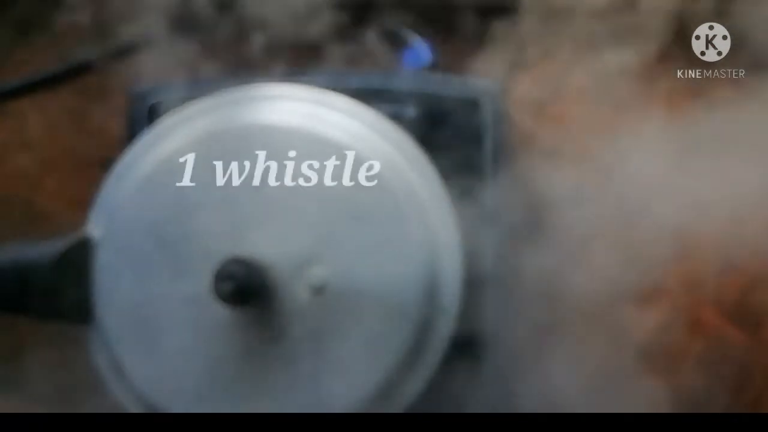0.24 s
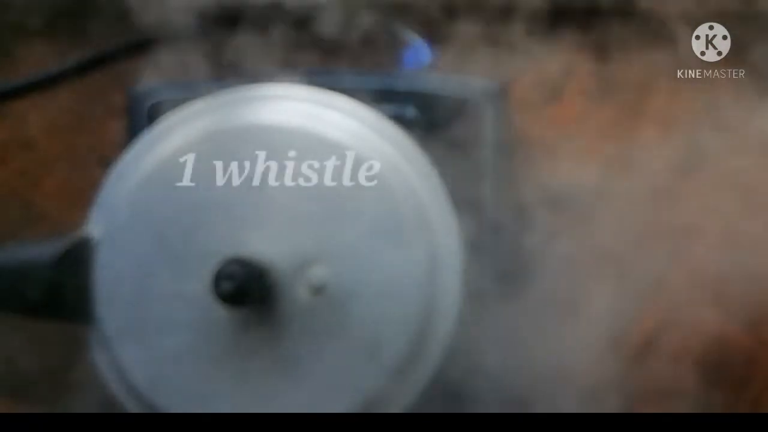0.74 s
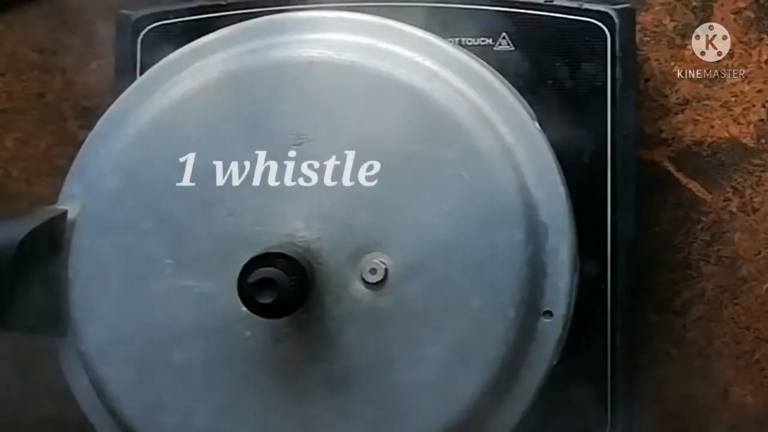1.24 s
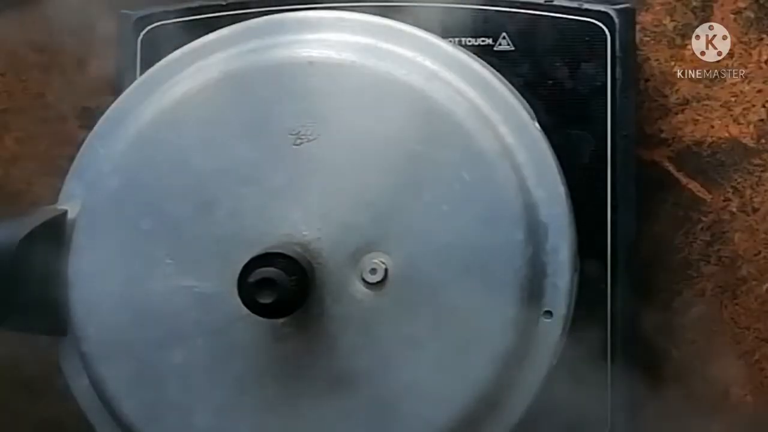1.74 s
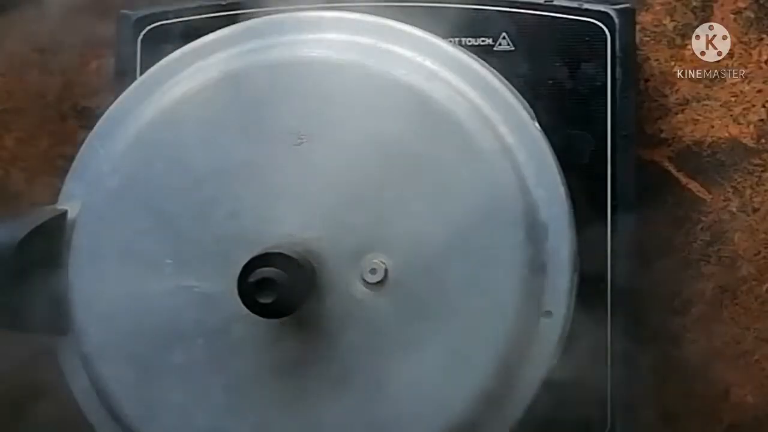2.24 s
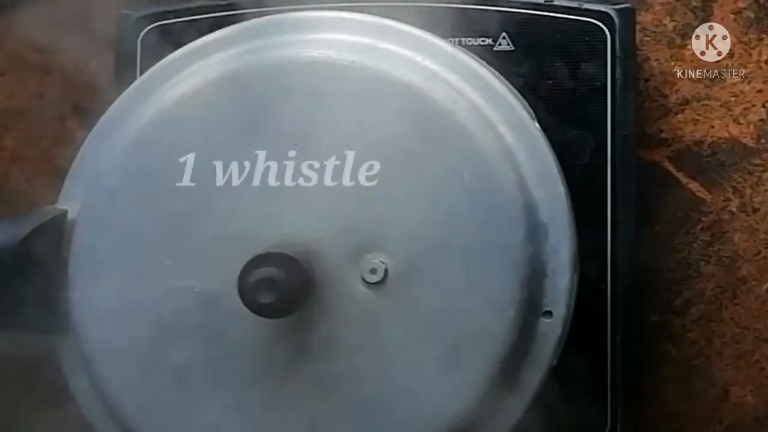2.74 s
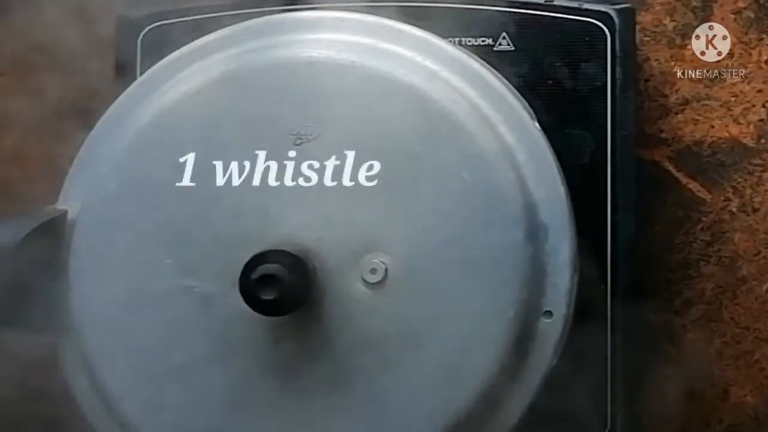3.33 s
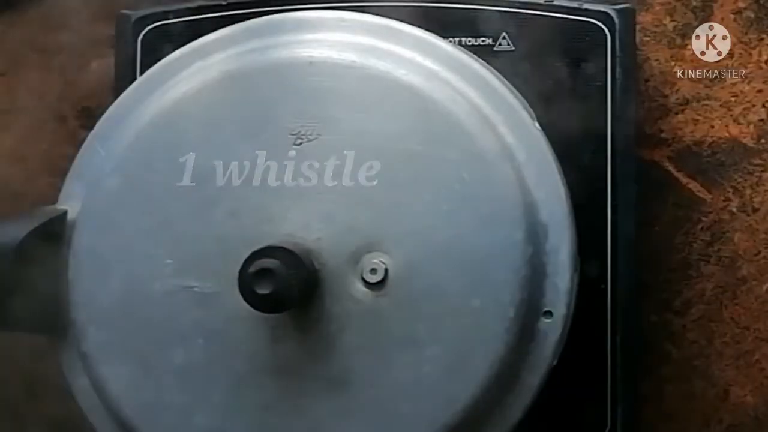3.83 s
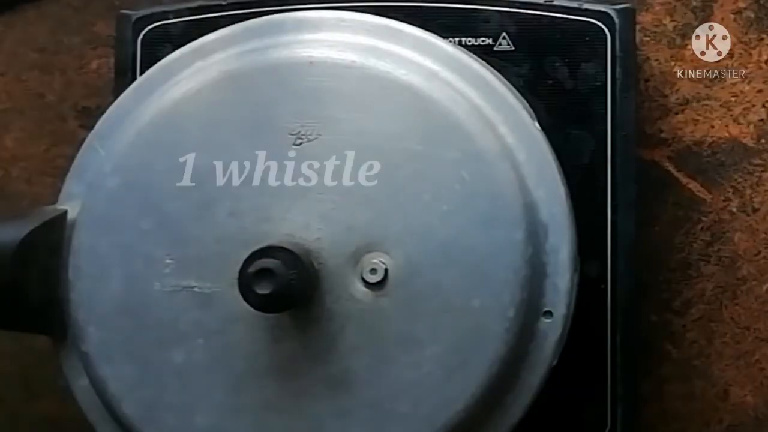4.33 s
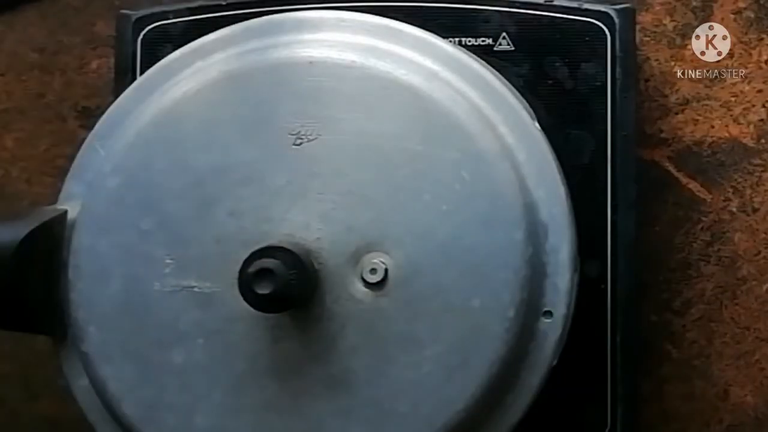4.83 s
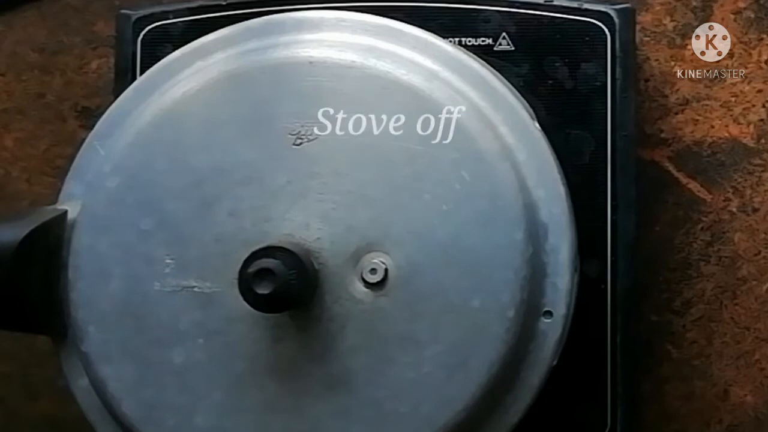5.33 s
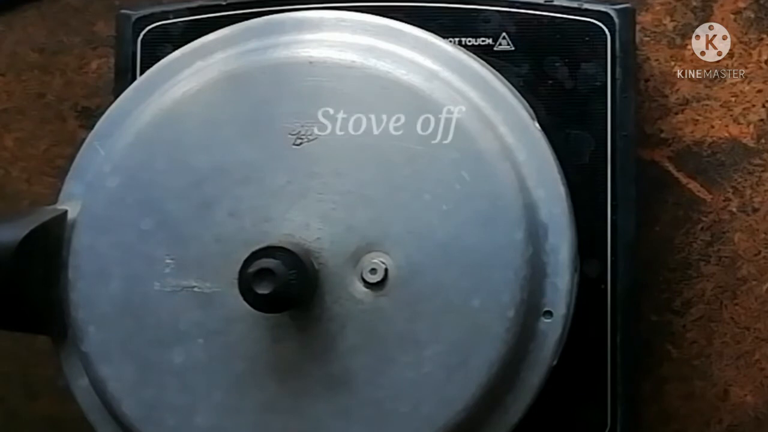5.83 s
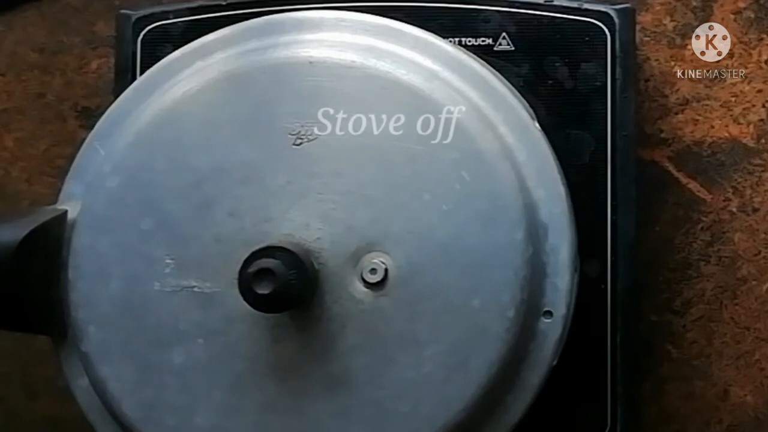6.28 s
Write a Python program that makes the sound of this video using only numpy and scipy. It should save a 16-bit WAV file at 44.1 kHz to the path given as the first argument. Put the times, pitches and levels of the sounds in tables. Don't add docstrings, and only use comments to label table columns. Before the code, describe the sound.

A pressure cooker blasts roaring steam in two blows with weight knocks between, then quiet kitchen hum, faint birds, a sheet-metal clank and distant tap.

```python
import sys
import numpy as np
from scipy import signal
from scipy.fft import rfft, irfft, next_fast_len
from scipy.io import wavfile
from scipy.ndimage import uniform_filter1d

SR = 44100
rng = np.random.default_rng(int(sys.argv[2]) if len(sys.argv) > 2 else 0)


def volts(x):
    e = np.asarray(x, float) / 20
    return 10 ** e


def wav_record(signal):
    frames = np.transpose(np.atleast_2d(signal))
    bounded = np.clip(frames, -1, 1)
    quanta = np.round(bounded * 32767).astype(np.int16)
    wavfile.write(sys.argv[1], SR, quanta)


N = 288855

# pitch in Hz,
# width in Hz, level in dB.
STEAM_PEAKS = [(4790, 200, -11), (5645, 35, -11), (6090, 70, -9), (6295, 35, -10), (6405, 30, -12),
               (6510, 30, -10), (6980, 50, -9), (7075, 20, -7), (7183, 35, -8), (7290, 30, -11),
               (8550, 400, -12), (10085, 40, -12)]
# pitch in Hz, level in dB per Hz.
JET_LEFT = [(50, -79), (300, -81), (600, -82.5), (1200, -76), (1700, -67), (3200, -59), (5000, -58),
            (6900, -61.5), (9300, -58), (9800, -49.5), (11800, -49), (13200, -56), (14800, -50),
            (15600, -60.5)]
JET_RIGHT = [(50, -79.5), (300, -79.5), (1000, -75.5), (2800, -65), (3200, -58), (5700, -55.5),
             (6100, -48.5), (6600, -48.5), (7100, -46), (7600, -53.5), (9400, -56.5), (9900, -54.5),
             (12000, -56), (15250, -68.5)]
# pitch in Hz, change in dB.
FIRST_LEFT = [(50, 0), (1500, 0.2), (3000, -1.5), (5500, -2), (7000, 0.5), (10000, -0.5), (11500, 1.5),
              (13000, -1), (14800, 3.5)]
FIRST_RIGHT = [(50, 0.5), (1500, 1), (3000, -2.5), (5500, -2.5), (7000, 0.5), (10000, 1.7), (11500, -2),
               (13000, 3), (14800, -7.5)]


def steam():
    jet = rng.standard_normal(N)
    ringing = sum(volts(db) * resonate(jet, hz, width) for hz, width, db in STEAM_PEAKS)
    jet = evened(jet + 2 * ringing)
    flutter_db = 0.6 * drift(20, 4) + 0.63 * drift(400, 16)
    flow_db, surge_db = flow()

    low = signal.sosfilt(signal.butter(2, 1000, fs=SR, output="sos"), jet)
    mid = signal.sosfilt(signal.butter(2, 5500, fs=SR, output="sos"), jet)
    fizz = signal.sosfilt(signal.butter(2, 10000, "high", fs=SR, output="sos"), jet)

    hiss = (jet - mid - fizz) * volts(np.maximum(flow_db, -47) + flutter_db)
    fizz = fizz * volts(np.maximum(1.35 * flow_db, -58) + flutter_db)
    body = (mid - low) * volts(np.maximum(0.96 * flow_db, -49) + 0.97 * flutter_db)
    roar_db = np.maximum(1.34 + flow_db + surge_db, -38)
    roar = low * volts(roar_db + 2.9 * drift(9.1))

    heard = colour(reach_ports(hiss + fizz + body + roar, -1.43), JET_LEFT, JET_RIGHT)
    flat_db = 10 * np.log10(2 / SR)
    first_left = [(hz, db + flat_db) for hz, db in FIRST_LEFT]
    first_right = [(hz, db + flat_db) for hz, db in FIRST_RIGHT]
    first = colour(heard, first_left, first_right)
    second = np.clip((np.arange(N) / SR - .98) / 0.054, 0, 1)
    return (1 - second) * first + second * heard


# blow starts in seconds, full flow in seconds, weight drops in seconds, rebound
# puff in dB, low surge before the drop in dB.
BLOWS = [
    (-1, -.5, .894, -2.5, 8),
    (1.015, 1.16, 3.336, -10, 5),
]


def flow():
    lift_db, sag_db_per_s, full_db = -14.5, 0.24, 0.61
    shut_s, shut_db = .03, -18
    rebound_s, rebound_width_s = .054, .01
    leak_db, leak_db_per_s = -12, 99
    surge_s = 0.1
    t = np.arange(N) / SR
    power, surge_db = np.full(N, 1e-12), np.zeros(N)
    for lift, full, drop, rebound_db, low_db in BLOWS:
        swell = np.clip((t - lift) / (full - lift), 0, 1)
        sag_db = sag_db_per_s * np.maximum(t - max(full, drop - 2.2), 0)
        open_db = lift_db * (1 - swell) ** 1.67 + full_db - sag_db
        closing_db = shut_db * np.maximum(t - drop, 0) / shut_s
        blow = volts(open_db + closing_db) * (t >= lift)

        after = t - drop - rebound_s
        puff = volts(rebound_db) * np.exp(-.5 * (after / rebound_width_s) ** 2)
        leak = volts(leak_db - leak_db_per_s * np.maximum(after, 0))
        leak = leak * np.clip(after / rebound_width_s + 1, 0, 1) * (after < 1)
        power += blow ** 2 + puff ** 2 + leak ** 2
        surge_db += low_db * np.exp(-np.where(t < drop, (drop - t) / surge_s, (t - drop) / shut_s))
    return 10 * np.log10(power), surge_db


# pitch in Hz, share of straight sound from 0 to 1,
# lag of the left port in radians.
STRAIGHT = [(49.7, 0.8, 0.15), (734, 1, 4.22), (1500, 0.66, 6.3), (1950, 0.23, 8.04), (5940, 0, 8.8),
            (5700, 0.25, 12.4), (7000, 0.37, 9.9), (8100, 0.69, 9.48), (10870, 0.68, 10.6),
            (11640, 0, 11.6), (15500, 0.38, 14)]
# delay in seconds, left level in dB, right level in dB.
ECHOES = [(.0093, -25.5, -10.5), (0.0051, -26, -15), (.0139, -19, -19)]


def reach_ports(x, wet_db):
    size = next_fast_len(N + 4096)
    hz = np.fft.rfftfreq(size, 1 / SR)
    share = np.clip(read(STRAIGHT, hz), 0, 1)
    lag = np.interp(hz, *np.array(STRAIGHT)[:, [0, 2]].T)
    echoes = 1
    for s, left_db, right_db in ECHOES:
        echoes = echoes + volts(np.array([[left_db], [right_db]])) * np.exp(-2j * np.pi * hz * s)
    scattered = .8 * diffuse(x) + .6 * kitchen(x)
    straight = rfft(x, size) * echoes * np.array([np.exp(-1j * lag), 1 + 0 * hz])
    both = np.sqrt(share) * straight + np.sqrt(1 - share) * volts(wet_db) * rfft(scattered, size)
    return irfft(both, size)[:, :N]


# pitch in Hz, time to fall by 60 dB in seconds.
KITCHEN_DECAY = [(200, 0.37), (800, 1), (2000, 0.39), (5500, 0.43), (9000, 0.37), (12000, 0.13),
                 (15000, 0.099)]


def diffuse(x):
    hz, _, z = signal.stft(x, SR, nperseg=256, noverlap=192)
    power = uniform_filter1d(abs(z) ** 2, size=9, axis=0)
    keep = 10 ** (-6 * 64 / SR / read(KITCHEN_DECAY, hz))
    trail = np.array([signal.lfilter([1 - k], [1, -k], p, zi=[p[:40].mean()])[0]
                      for k, p in zip(keep, power)])
    fresh = signal.stft(rng.standard_normal((2, N)), SR, nperseg=256, noverlap=192)[2]
    fresh = fresh / np.sqrt(np.mean(abs(fresh) ** 2))
    return signal.istft(fresh * np.sqrt(trail), SR, nperseg=256, noverlap=192)[1][:, :N]


def kitchen(x):
    taps = np.zeros((2, SR // 2))
    at = np.arange(400, SR // 2 - 10, 10) + rng.integers(0, 10, (2, (SR // 2 - 401) // 10))
    np.put_along_axis(taps, at, rng.choice([-1., 1.], at.shape), 1)
    hz, t, z = signal.stft(taps, SR, nperseg=256)
    z = z * volts(-60 * t / read(KITCHEN_DECAY, hz)[:, None])
    z = z / np.sqrt((abs(z) ** 2).sum((0, 2)))[:, None]
    tail = signal.istft(z, SR, nperseg=256)[1]
    return signal.fftconvolve(x[None], tail / np.linalg.norm(tail[0]), axes=1)[:, :N]


# start in seconds, level in dB, pitch in Hz,
# chatter level in dB, time for the chatter to fall by 60 dB in seconds.
KNOCKS = [(.928, -21.5, 1500, -8, .06), (.956, -23, 1780, -22, .06), (.985, -27, 1340, -12, .06),
          (.99, -33.5, 825, -8, 0.11), (1.011, -29, 890, -12.5, 0.27), (3.369, -29.5, 900, -13, 0.41),
          (3.371, -30.5, 1590, -14, 0.084), (3.412, -32, 1690, -8.5, 0.26), (3.414, -34.5, 840, -7.5, .35),
          (3.53, -48, 940, -16, .2), (.93, -42, 345, -8.5, .98), (3.371, -47.5, 350, -5.5, .53),
          (.77, -53, 70, -20, .1)]


def knocks():
    out, t = np.zeros(N), np.arange(SR // 4) / SR
    for s, db, hz, chatter_db, t60 in KNOCKS:
        width = .48 * hz
        shake = rng.standard_normal(len(t))
        tick = resonate(resonate(1. * (t == 0), hz, width), hz, width)
        chatter = evened(resonate(resonate(shake, hz, width), hz, width))
        chatter = chatter * volts(chatter_db - 60 * t / t60)
        out[round(s * SR):][:len(t)] += volts(db) * (tick / abs(tick).max() + chatter)
    return out + volts(-1.0) * kitchen(out)


# start in seconds, level in dB.
CLANK_HITS = [
    (5.2543, 4),
    (5.2618, -8),
    (5.2816, 5),
    (5.315, -13),
]
# pitch in Hz, level in dB, time to fall by 60 dB in seconds.
CLANK_MODES = [(390, -10.5, .214), (1029, -4.5, 0.17), (2250, -6.5, 0.19), (3563, -5, 0.22),
               (4371, -9, .15), (4931, -13, .2), (5700, -18, .14), (5800, -8, .2), (6160, 1.5, 0.17),
               (6433, -6, .2), (6970, -0.5, .22), (7600, -18, .24), (10700, -12, .05), (13300, -10, .05)]
# pitch in Hz, level in dB per Hz.
CLANK_LEFT = [(50, -95), (250, -80), (1500, -71.5), (2300, -65), (4000, -68.5), (6000, -71.5), (7800, -80),
              (9000, -74), (11000, -69), (13000, -64.5), (15250, -61.5)]
CLANK_RIGHT = [(50, -103), (250, -79.5), (1500, -74), (2300, -67.5), (4000, -64.5), (6000, -60.5),
               (7800, -63.5), (9000, -78), (11000, -70), (13000, -70), (15250, -79)]


def clank():
    rattle_s, rattle_db, hold_s, release_db_per_s = 5.254, 2, 0.048, 202
    settle_s, settle_db, settle_width_s = 5.46, -29, .018
    t = np.arange(N) / SR
    release_db = release_db_per_s * np.maximum(t - rattle_s - hold_s, 0)
    rattle = volts(rattle_db - release_db) * (t >= rattle_s)
    settle = volts(settle_db) * np.exp(-.5 * ((t - settle_s) / settle_width_s) ** 2)
    drive = rng.standard_normal(N) * (rattle + settle)
    drive *= volts(2.64 * drift(300, 30))
    t = np.arange(600) / SR
    for s, db in CLANK_HITS:
        drive[round(s * SR):][:len(t)] += volts(db + 1.0 - 60 * t / 0.019) * rng.standard_normal(len(t))

    t = np.arange(SR // 2) / SR
    modes = sum(volts(db - 60 * t / min(t60, .24)) * np.sin(2 * np.pi * hz * t)
                for hz, db, t60 in CLANK_MODES)
    metal = drive + volts(-35.5) * signal.fftconvolve(drive, modes)[:N]
    heard = np.array([np.roll(metal, 2), metal]) + volts(0.5) * kitchen(metal)
    return volts(-4.0) * colour(heard, CLANK_LEFT, CLANK_RIGHT)


# start in seconds, length in seconds, first pitch in Hz, last pitch in Hz,
# level in dB.
BIRDS = [
    (3.85, .065, 3560, 3500, -54.5),
    (4.3, .044, 3480, 3460, -62),
    (4.73, .05, 3470, 3420, -62),
    (5.125, .055, 4500, 3150, -66),
    (6.26, .068, 4280, 3200, -68),
]


def birds():
    out = np.zeros(N)
    for s, length, start_hz, end_hz, db in BIRDS:
        hz = np.geomspace(start_hz, end_hz, round(length * SR))
        call = np.sin(2 * np.pi * np.cumsum(hz) / SR) * signal.windows.tukey(len(hz), .5)
        out[round(s * SR):][:len(hz)] += volts(db) * call
    return out * volts(np.array([[.5], [-.5]]))


def far_tap():
    start_s, level_db, open_s, hold_s, fall_db_per_s = 5.6, -62.5, 0.13, 0.32, 6
    t = np.arange(N) / SR - start_s
    opening = np.clip(t / open_s, 0, 1) ** 2
    level = opening * volts(level_db - fall_db_per_s * np.maximum(t - open_s - hold_s, 0))
    return level * evened(resonate(rng.standard_normal((2, N)), 3040, 500))


# pitch in Hz, level in dB per Hz.
AIR_LEFT = [(50, -86.8), (150, -88.6), (400, -80.1), (600, -89.8), (1000, -84.0), (1500, -85.5),
            (2500, -91.5), (4200, -98.5), (6200, -98.8), (8500, -102.4), (9500, -94.1), (11800, -88.8),
            (13000, -101.0), (14800, -91.6), (15250, -101.8)]
AIR_RIGHT = [(50, -87.0), (150, -87.9), (400, -82.3), (600, -84.6), (1000, -85.7), (1500, -87.5),
             (2500, -93.6), (4200, -98.8), (6200, -91.8), (8500, -98.5), (9500, -99.1), (11800, -100.4),
             (13000, -105.9), (14800, -104.5), (15250, -109.5)]
# pitch in Hz, likeness from -1 to 1.
AIR_SAME = [(60, 0.99), (150, 1), (380, 0.23), (950, 0.25), (2380, 0.38), (5980, -0.46), (15000, 0.14)]
# pitch in Hz, level in dB.
HUM = [(301.5, -64), (403.7, -68), (430.7, -64), (500.6, -68), (602.9, -72), (699.8, -65.5), (753.7, -69.5),
       (855.9, -65), (1001, -67.5), (1104, -67)]


def air():
    cooling_from_s, cooling_s, cooling_db = 3.8, 1.1, 2.8
    frames, hz = N // 256 + 5, np.fft.rfftfreq(1024, 1 / SR)
    a, b, c, d, patches = rng.standard_normal((frames, 513, 5)).T
    patches = uniform_filter1d(uniform_filter1d(patches, 14, 0), 20, 1)
    same = np.clip(read(AIR_SAME, hz), -1, 1)[:, None]
    left = a + 1j * b
    right = same * left + np.sqrt(1 - same ** 2) * (c + 1j * d)
    z = np.array([left, right]) * volts(1.1 * patches / patches.std())
    noise = signal.istft(z, nperseg=1024, noverlap=768)[1][:, :N]
    tone = colour(evened(noise), AIR_LEFT, AIR_RIGHT)

    leak = signal.sosfilt(signal.butter(1, 2500, "high", fs=SR, output="sos"), tone)
    t = np.arange(N) / SR
    warmth = np.exp(-np.maximum(t - cooling_from_s, 0) / cooling_s)
    tone = tone - leak + leak * volts(0.5 - cooling_db * (1 - warmth))
    hum = sum(volts(db + drift(8.6)) * np.sin(2 * np.pi * (hz * t + rng.random())) for hz, db in HUM)
    return volts(-.5) * tone + hum


def evened(x):
    return x / np.sqrt(np.mean(x ** 2, -1, keepdims=True) + 1e-20)


def read(points, hz, column=1):
    table = np.array(points)
    return np.interp(np.log(hz + 1), np.log(table[:, 0] + 1), table[:, column])


def colour(x, left, right):
    hz = np.fft.rfftfreq(4096, 1 / SR)
    density_db = np.array([read(left, hz), read(right, hz)])
    cep = irfft(np.log(volts(density_db) * np.sqrt(SR / 2)))
    cep[:, 1:2048] *= 2
    cep[:, 2049:] = 0
    return signal.oaconvolve(x, irfft(np.exp(rfft(cep)))[:, :2048], axes=1)[:, :N]


def drift(top_hz, low_hz=0.303):
    t = np.arange(0, N + 64, 64) / SR
    v = sum(np.sin(2 * np.pi * (f * t + rng.random())) / np.sqrt(f)
            for f in np.geomspace(low_hz, top_hz, 30))
    return np.interp(np.arange(N) / SR, t, evened(v))


def resonate(x, hz, width):
    return signal.lfilter(*signal.iirpeak(hz, hz / width, SR), x)


def scene():
    return steam() + knocks() + clank() + air() + birds() + far_tap()


def band_limit(x):
    return signal.sosfilt(signal.butter(12, 15800, fs=SR, output="sos"), x)


# limit when loud in Hz, limit when quiet in Hz.
EDGE_HZ = [(15580, 15230), (15300, 15230)]


def record(dry):
    knee, room = .62, .25
    over = np.maximum(abs(dry) - knee, 0)
    dry = dry - np.sign(dry) * (over - room * np.tanh(over / room))
    edges = np.array([[signal.firwin(1023, hz, window=("kaiser", 10), fs=SR) for hz in port]
                      for port in EDGE_HZ])
    wide, narrow = (signal.oaconvolve(dry, edges[:, k], "same", axes=1) for k in range(2))
    level_db = 10 * np.log10(abs(uniform_filter1d((dry ** 2).mean(0), size=1024)) + 1e-12)
    loud = np.clip((level_db + 28) / 4, 0, 1)
    return band_limit(loud * wide + (1 - loud) * narrow)


dry = scene()
out = record(dry)
wav_record(out)
```